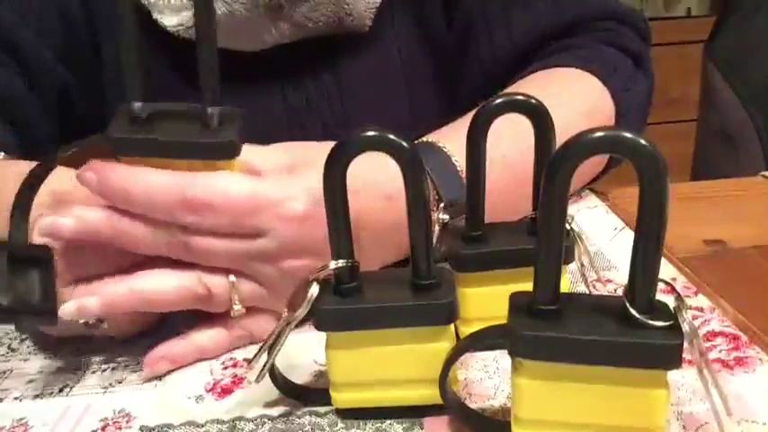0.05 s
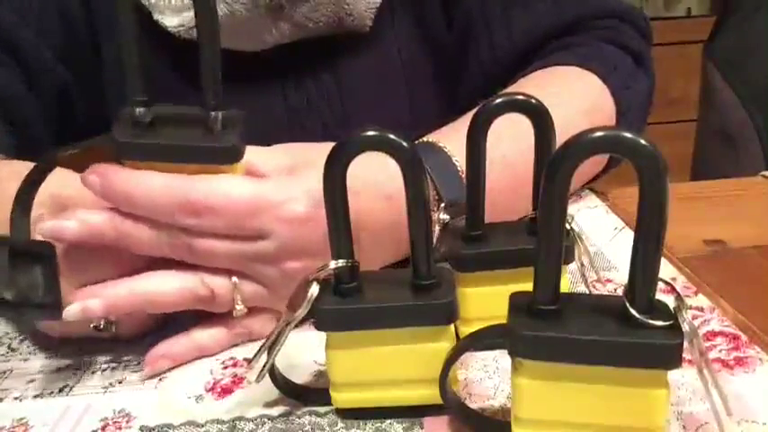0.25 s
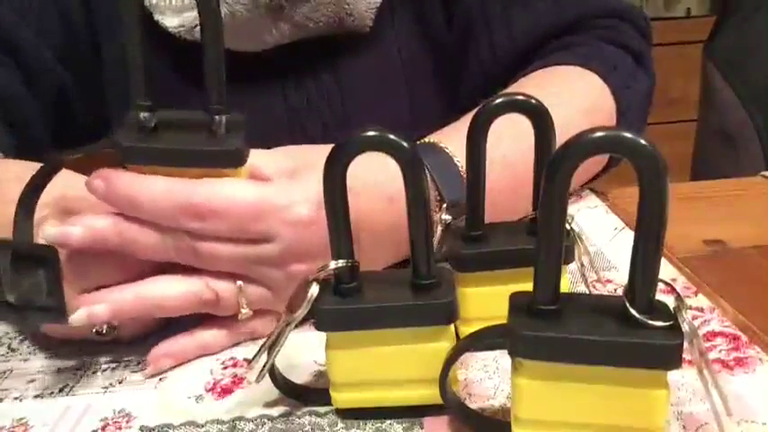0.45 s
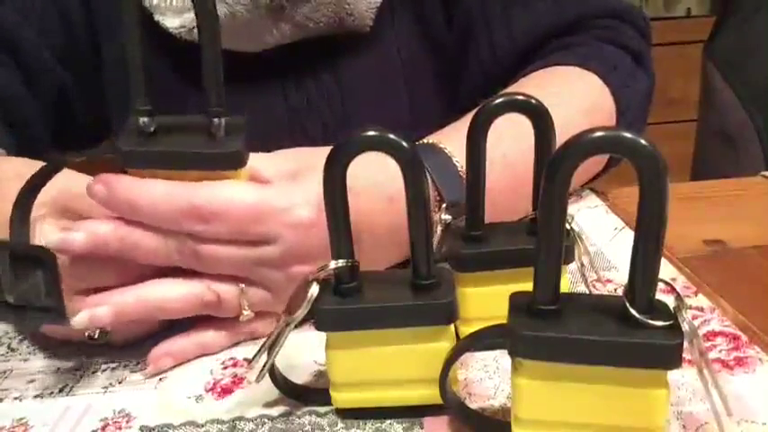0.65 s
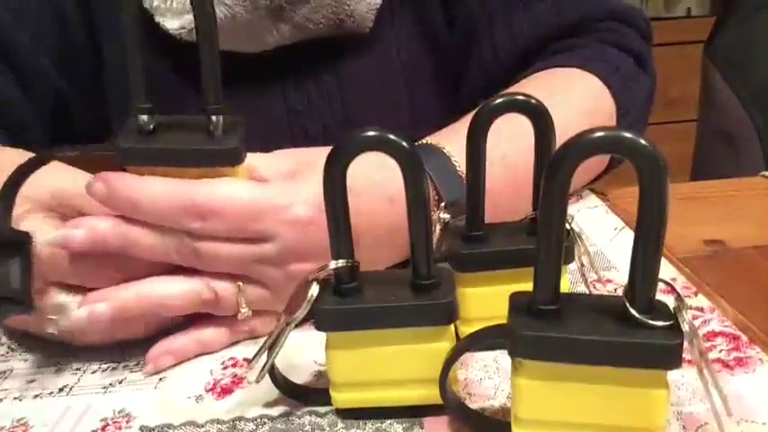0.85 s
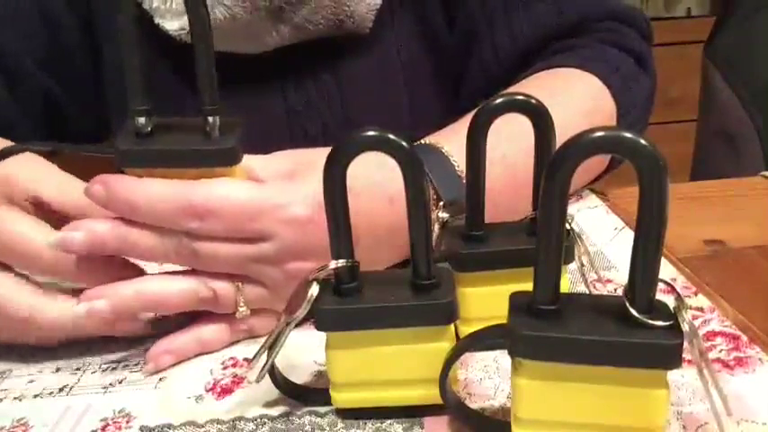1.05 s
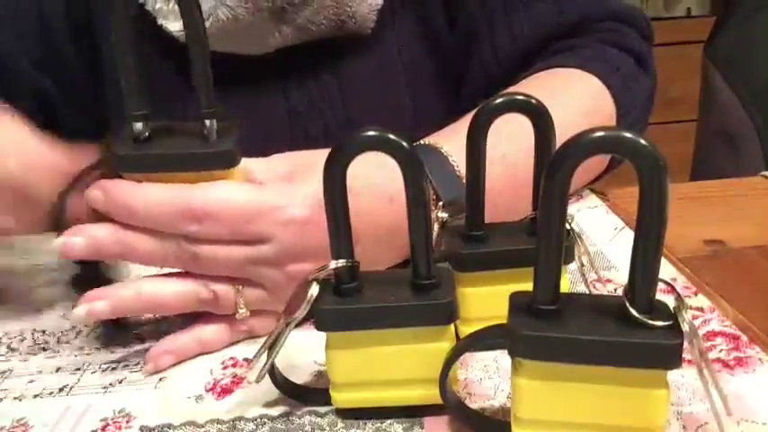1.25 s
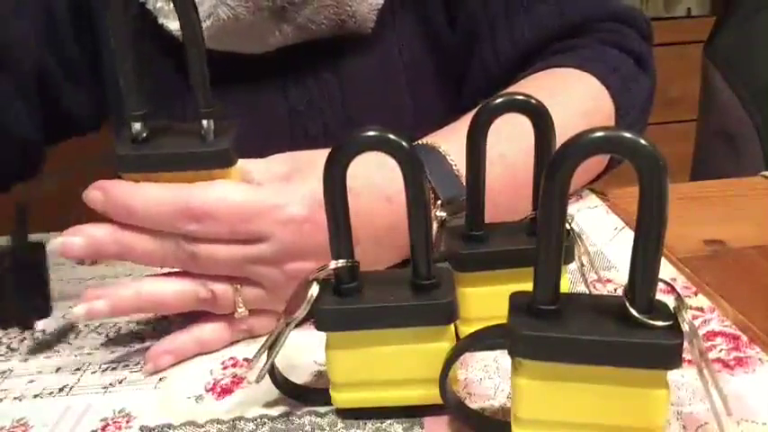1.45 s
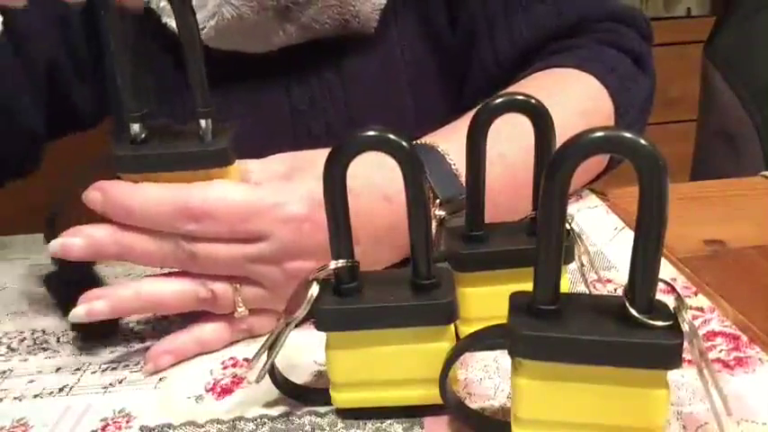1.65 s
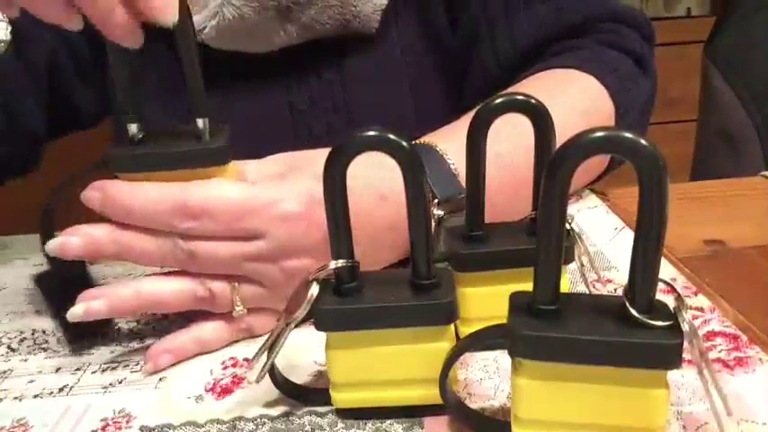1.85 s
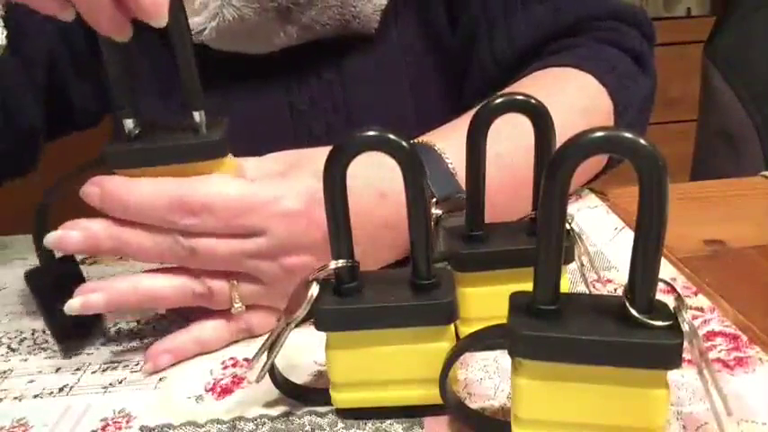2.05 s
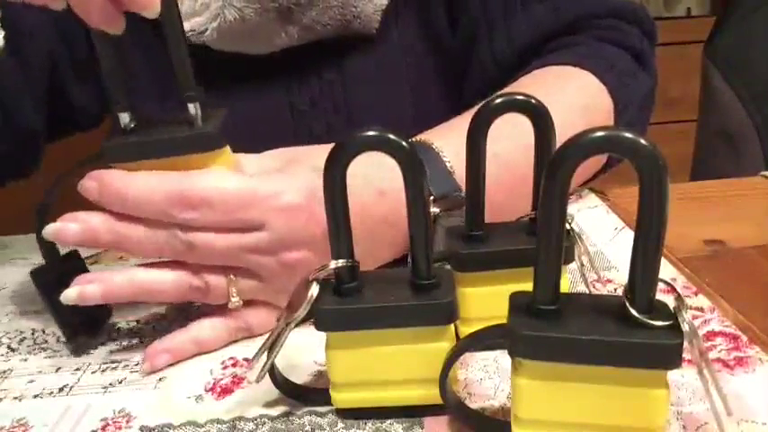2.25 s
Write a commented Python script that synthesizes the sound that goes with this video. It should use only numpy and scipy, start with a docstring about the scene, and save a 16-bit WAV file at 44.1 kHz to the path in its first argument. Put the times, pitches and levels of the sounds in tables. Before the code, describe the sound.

A padlock snaps shut at about 0.2 seconds: a tight burst of steel contacts lasting a few hundredths of a second, bright and dry, with a dull case knock, soft low table thump and short small-room tail. A light key tick follows at 0.7, fainter ticks and slides around 0.8 to 1.1, and small ticks near 1.6, 1.8 and 2.1, over quiet room hush and faint low motor hum.

```python
"""Padlock snapping shut in the hands

The latch and shackle of a laminated padlock clash in a run of contacts about 24 ms long: each rings damped
steel modes and knocks the case. Decaying sines make the table thump, and decaying noise makes a small room ring on.
Faint ticks of the key and ring are struck brass modes; its slides are dense grains through a resonance.
Below lie a motor hum at 49 Hz, made of wavering sines, and the room's hush, made of band-filtered noise."""
import sys
import numpy as np
from scipy import signal
from scipy.io import wavfile

SR = 44100
rng = np.random.default_rng(int(sys.argv[2]) if len(sys.argv) > 2 else 0)


def to_wav(sig):
    """Store sig (one row per channel, or 1-D mono) as 16-bit WAV at the path in sys.argv[1].

    Samples outside -1..1 are clipped; the rate is SR.
    """
    pcm = np.clip(np.atleast_2d(sig), -1, 1) * 32767
    pcm = np.round(pcm).astype(np.int16)
    wavfile.write(sys.argv[1], SR, pcm.T)  # frames by channels


def volts(x):
    """Linear amplitude factor 10**(x/20) for a level x in dB, scalar or array-like."""
    e = np.asarray(x, float) / 20
    return 10 ** e


N = 101429  # length in samples

# Contacts of latch and shackle. Each row: start in seconds, peak level in dB, hardness as centre in Hz,
# peak level of the knock in the case in dB.
SNAP_CONTACTS = [(.1966, -42, 6000, -50), (.1975, -28, 2500, -36), (.1987, -27, 7000, -40),
                 (.1996, -25, 4500, -44), (.2004, -12, 3400, -38), (.2013, -21, 3000, -30),
                 (.2023, -23, 2200, -36), (.204, -32, 7000, -50), (.2045, -4, 7000, -27),
                 (.2050, -14, 2400, -28), (.206, -13, 3500, -36), (.2069, -18, 10500, -38),
                 (.2078, -18, 4000, -36), (.2088, -16, 8500, -36), (.2098, -20, 4200, -36),
                 (.2107, -24, 1800, -26), (.212, -25, 1600, -34), (.2129, -24, 7000, -38),
                 (.2142, -23, 5000, -40), (.2153, -18, 9000, -42), (.2157, -12, 7800, -34),
                 (.2162, -11, 7200, -34), (.2168, -12, 3700, -38), (.2177, -21, 4500, -40),
                 (.219, -31, 6000, -37), (.2201, -33, 2500, -42)]
# Modes of the lock's steel. Each row: frequency in Hz, relative level in dB, t60 in seconds.
STEEL_MODES = [(1512.5, -1, 0.011), (1990, -2.5, .006), (2700, -2.5, 0.0061), (3390, -2.5, 0.0077),
               (4310, -1.5, 0.0045), (5500, -4, 0.0059), (6200, -3, .005), (6940, 0.5, 0.0048),
               (7860, -7.5, .01), (8530, -0.5, 0.0027), (9970, -4.5, 0.0031), (10800, -1.5, 0.0034),
               (11400, -8, 0.013), (1763, -37.5, 0.79), (8058, -40, 0.083)]
# Modes of the case and the hand round it. Each row: frequency in Hz, relative level in dB, t60 in seconds.
CASE_MODES = [(201.2, -17, 0.028), (304.2, 4.5, .015), (443.3, 2.5, 0.046), (587, -2.5, 0.014),
              (782, -3, .022), (1150, -3.5, .008)]
CASE_HARDNESS_HZ, KNOCK_Q = 651.6, 0.52
CONTACT_Q, CRACK_DB, STRENGTH_SPREAD_DB = 1.2, 11, 1.5
# Ticks of key and ring. Each row: start in seconds, peak level in dB, hardness as centre in Hz, narrowness Q.
KEY_TICKS = [(.059, -64, 2000, 1.1), (.112, -57, 4000, 4.0), (.291, -50, 1850, 6.0), (.699, -54, 4300, 4.0),
             (.7028, -34, 3600, .8), (.709, -47, 6500, .8), (.732, -58, 3800, 2.5), (.788, -57, 4300, 4.0),
             (.8025, -60, 5000, 1.1), (.8065, -57, 6000, .8), (.825, -57, 4400, 4.0),
             (.9345, -64, 1500, 1.5), (1.0305, -58, 3200, 4.0), (1.0465, -60, 6200, 2.5),
             (1.058, -59, 5500, 1.1), (1.0615, -58, 5000, 1.1), (1.635, -46, 6000, .6),
             (1.7685, -47.5, 5000, .6), (2.083, -54, 7500, 1.1)]
# Modes of the brass key. Each row: frequency in Hz, relative level in dB, t60 in seconds.
KEY_MODES = [(1900, -14.5, .008), (2669, -4, 0.0068), (3120, 4.5, 0.0065), (4150, -3, 0.013),
             (5770, -12, .006), (6200, -7.5, 0.0092), (7370, -4.5, .01), (8900, -4.5, 0.007),
             (9620, -12, 0.011), (10967, -3, 0.0079), (12105, -1, 0.0036)]
# Slides of the key under the fingers. Each row: start in seconds, length in seconds,
# level of the edge resonance in dB at the height of the swell, frequency of the rubbed edge in Hz.
KEY_SLIDES = [(0.161, 0.082, -68, 3300), (0.777, 0.11, -73.5, 3600), (0.938, 0.21, -72.5, 3340),
              (1.03, 0.06, -70, 6200), (1.084, 0.11, -75.5, 3270), (1.07, 0.17, -85.5, 6800),
              (1.79, 0.052, -75.5, 2700), (1.83, .06, -78.5, 3480), (2.216, .06, -82.5, 6850)]
SLIDE_GRAINS_PER_S, SLIDE_WIDTH_HZ = 1700, 397
SLIDE_HISS_HZ, SLIDE_HISS_DB = 4551, -3.5  # dB relative to the edge resonance
# Jolts that reach the table through the wrists. Each row: start in seconds, frequency in Hz,
# initial level of the decay in dB, before the soft onset, t60 in seconds.
TABLE_JOLTS = [(.203, 135, -37, .06), (.229, 54, -43, .18), (.229, 90, -45, .12)]
THUMP_RISE_S = .008  # time constant
# Reverberation of the room. Each row: frequency in Hz, level in dB of the noise density extrapolated
# to time zero, t60 in seconds.
ROOM_DECAY = [(100, -31, 0.52), (300, -37, 0.25), (765, -47.5, 0.29), (1892, -34.5, 0.26),
              (3399, -44.5, 0.3), (6570, -42.5, .35), (8333, -43.5, 0.22), (12000, -55, 0.15)]
ROOM_DELAY_S = 0.011
# Lines of the motor. Each row: frequency in Hz, rms level in dB, waver in dB (its sign sets the direction).
MOTOR_LINES = [(49, -69, -0.65), (98.4, -79, -1), (216, -75, 3.5)]
# Spectrum of the room's hush. Each row: frequency in Hz, relative density in dB per Hz.
HUSH_SPECTRUM = [(35, -20), (48, -5), (70, -8), (124, -8.5), (208, -6), (437, -13.5), (897, -20.5),
                 (2500, -24), (6500, -26.5), (8500, -28.5), (10300, -37), (11700, -33.5)]
HUSH_DB, HUSH_FLICKER_DB = -67.5, .35  # rms of the whole hush; spread of each band
MIC_TOP_HZ, MIC_STEP_DB, MIC_END_HZ = 11750, 22, 13000


def ring(x, hz, t60):
    """Damped oscillator: a unit click excites an exponentially decaying sine of height 1."""
    radius = volts(-60 / (t60 * SR))
    angle = 2 * np.pi * hz / SR
    return signal.lfilter([0, np.sin(angle)], [1, -2 * radius * np.cos(angle), radius ** 2], x + 1e-18)


def resonance(x, hz, width_hz):
    """Two-pole resonance: a band-pass with about unit gain at its centre."""
    radius = np.exp(-np.pi * width_hz / SR)
    poles = [1, -2 * radius * np.cos(2 * np.pi * hz / SR), radius ** 2]
    return signal.lfilter([(1 - radius ** 2) / 2, 0, (radius ** 2 - 1) / 2], poles, x)


def strike(rows, modes, size):
    """Modal excitation: a blow rings every mode, most strongly those near the centre set by its hardness."""
    out = np.zeros(N + size)
    click = np.eye(1, size)[0]
    rings = np.array([ring(click, hz, t60) * volts(db) * (-1) ** k
                      for k, (hz, db, t60) in enumerate(modes)])
    chance = rng.standard_normal((len(rows), len(modes)))
    for (s, db, hz, q), spread in zip(rows, chance):
        body = volts(STRENGTH_SPREAD_DB * spread) @ rings + volts(CRACK_DB) * click
        body = resonance(body, hz, hz / q)
        body = resonance(body, hz, 2 * hz / q)
        start = int(s * SR)
        out[start:start + size] += volts(db) * body / np.abs(body).max()
    return out[:N]


def lock():
    """Coupled impact: every contact excites the bright steel and the duller case at the same instant."""
    contacts = [(s, db, hz, CONTACT_Q) for s, db, hz, _ in SNAP_CONTACTS]
    knocks = [(s, db, CASE_HARDNESS_HZ, KNOCK_Q) for s, _, _, db in SNAP_CONTACTS]
    steel = strike(contacts, STEEL_MODES, size=12000)
    return steel + strike(knocks, CASE_MODES, size=4000)


def table():
    """Low modal response: each jolt makes a decaying sine with a soft onset."""
    out = 0
    for s, hz, db, t60 in TABLE_JOLTS:
        t = np.maximum(np.arange(N) / SR - s, 0)
        rise = 1 - np.exp(-t / THUMP_RISE_S)
        out = out + volts(db - 60 * t / t60) * rise * np.sin(2 * np.pi * hz * t)
    return out


def key_ticks():
    """Modal excitation of brass: light blows ring the short modes of the key."""
    return strike(KEY_TICKS, KEY_MODES, size=2000)


def rms_one(x):
    """Normalisation: the signal is scaled to unit rms."""
    return x / np.sqrt(np.mean(x ** 2) + 1e-20)


def slides():
    """Friction as a dense train of uneven grains, heard as hiss and through the rubbed edge's resonance."""
    t = np.arange(N) / SR
    grains = (rng.random(N) < SLIDE_GRAINS_PER_S / SR) * volts(2.0 * rng.exponential(1, N))
    grains = grains * rng.choice([-1, 1], N)
    hiss = volts(SLIDE_HISS_DB) * rms_one(resonance(grains, SLIDE_HISS_HZ, SLIDE_HISS_HZ))
    out = 0
    for s, length, db, hz in KEY_SLIDES:
        swell = np.sin(np.pi * np.clip((t - s) / length, 0, 1))
        edge = rms_one(resonance(grains, hz, SLIDE_WIDTH_HZ))
        out = out + volts(db) * swell * (hiss + edge)
    return out


def at_hz(rows, hz):
    """Interpolation on a logarithmic frequency axis: the table's other columns at one frequency."""
    f, *columns = np.transpose(rows)
    return [np.interp(np.log(hz), np.log(f), c) for c in columns]


def bands():
    """Third-octave analysis: band-pass filters with their centres in Hz."""
    edges = 33 * 2 ** np.arange(0, 9, 1 / 3)
    return [(np.sqrt(a * b), signal.butter(2, [a, b], "band", fs=SR, output="sos"))
            for a, b in zip(edges, edges[1:])]


def room(x):
    """Diffuse reverberation: convolution with noise that decays exponentially, band by band."""
    t = np.arange(SR // 2) / SR
    tail = 0
    white = rng.standard_normal((2, len(t)))
    for k, (hz, sos) in enumerate(bands()):
        db, t60 = at_hz(ROOM_DECAY, hz)
        tail = tail + volts(db - 60 * t / t60) * signal.sosfilt(sos, white[k % 2])
    onset = np.clip(t / ROOM_DELAY_S - 1, 0, 1)  # silent for one delay, full after two
    return signal.fftconvolve(x, tail * onset)[:N]


def drift(rate):
    """Low-pass random process: slow noise of unit rms with a double pole at the rate in Hz."""
    pole = np.exp(-80 * np.pi * rate / SR)  # computed at every 40th sample
    white = rng.standard_normal(N // 40 + 2002)
    slow = signal.lfilter([1], [1, -2 * pole, pole ** 2], white)[2000:]
    return np.interp(np.arange(N) / 40, np.arange(len(slow)), rms_one(slow))


def hum():
    """Line spectrum of a distant motor: sines that waver randomly in level and phase."""
    t = np.arange(N) / SR
    out = 0
    for hz, db, waver_db in MOTOR_LINES:
        level = np.sqrt(2) * volts(db + waver_db * drift(1.7))
        phase = 0.54 * waver_db * drift(1.5)  # radians
        out = out + level * np.sin(2 * np.pi * hz * t + phase)
    return out


def hush():
    """Stationary noise of room and microphone: weighted bands, each flickering slightly in level."""
    white = rng.standard_normal((2, N + SR // 2))
    out = 0
    for k, (hz, sos) in enumerate(bands()):
        level = volts(at_hz(HUSH_SPECTRUM, hz)[0] + HUSH_FLICKER_DB * drift(2.5))
        out = out + level * signal.sosfilt(sos, white[k % 2])[-N:]
    return volts(HUSH_DB) * rms_one(out)


def scene():
    """Superposition: lock and key with their reflections, the table and the background."""
    near = lock() + key_ticks() + slides()
    return (near + room(near) + table() + hush() + hum())[None]


def low_pass(x):
    """Removes everything above the highest recorded frequency."""
    return signal.sosfilt(signal.butter(12, 13860, fs=SR, output="sos"), x)


def record(dry):
    """Band limitation: low-pass filters step the treble down at one edge and end it at a second."""
    step = signal.ellip(5, .5, MIC_STEP_DB, MIC_TOP_HZ, fs=SR, output="sos")
    end = signal.cheby2(8, 30, MIC_END_HZ, fs=SR, output="sos")
    mix = signal.sosfilt(np.vstack([step, end]), dry)
    return low_pass(mix)


dry = scene()
out = record(dry)
to_wav(out)
```